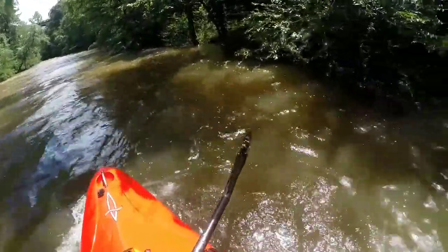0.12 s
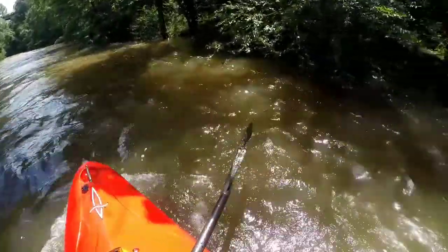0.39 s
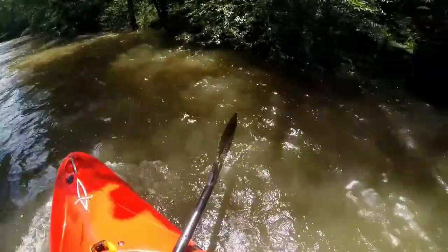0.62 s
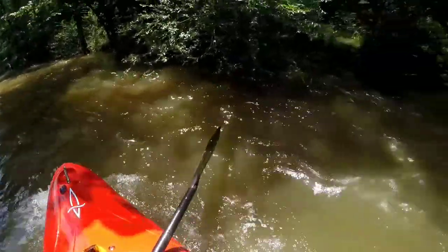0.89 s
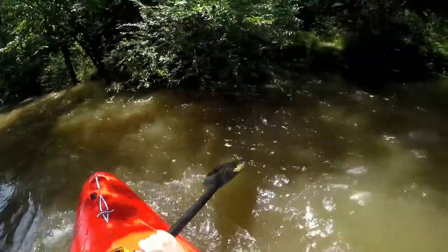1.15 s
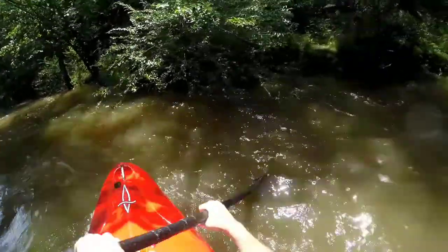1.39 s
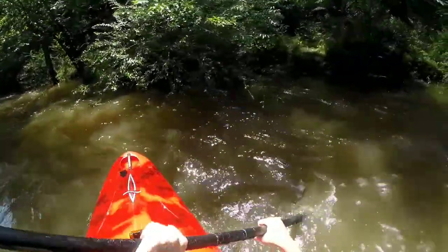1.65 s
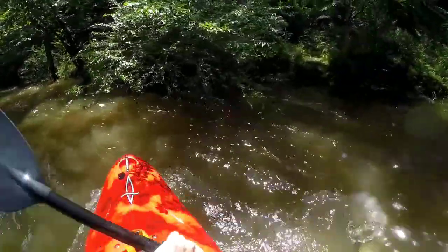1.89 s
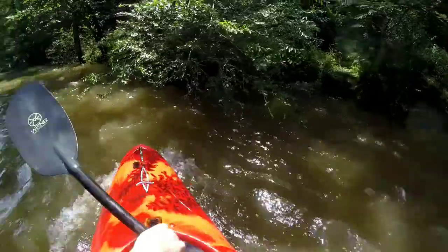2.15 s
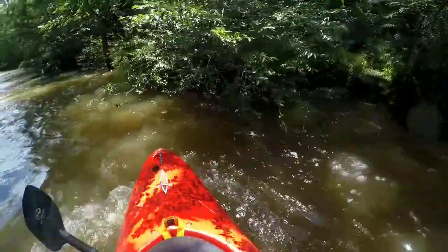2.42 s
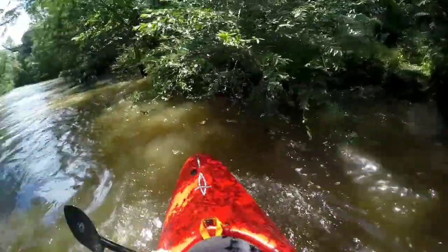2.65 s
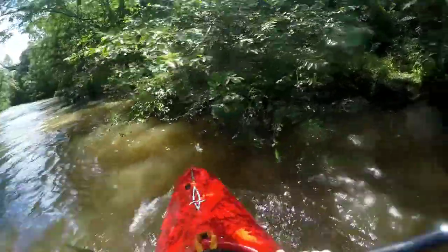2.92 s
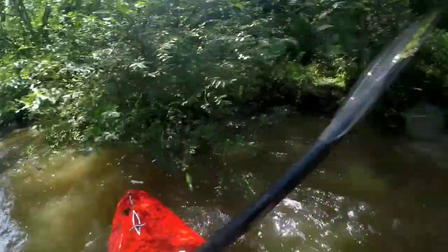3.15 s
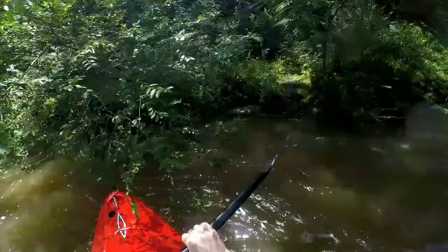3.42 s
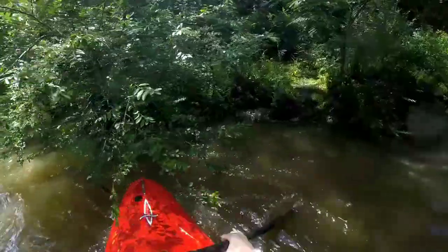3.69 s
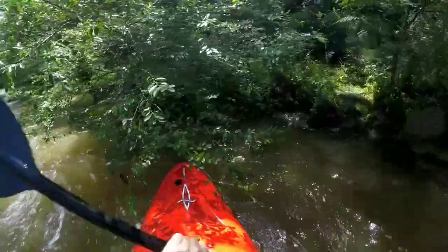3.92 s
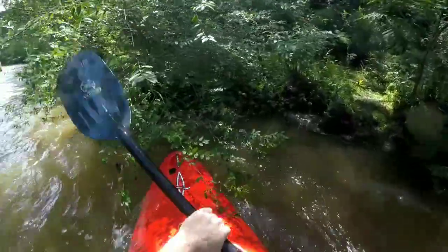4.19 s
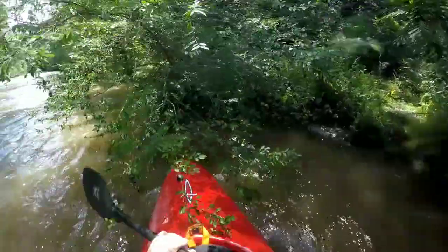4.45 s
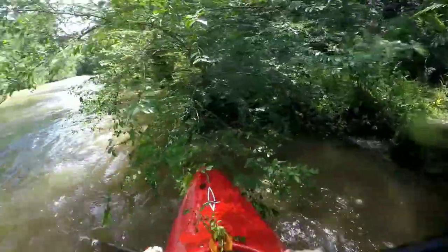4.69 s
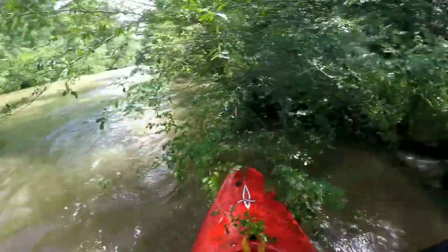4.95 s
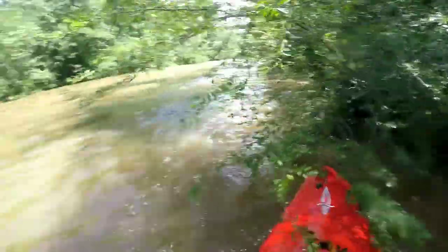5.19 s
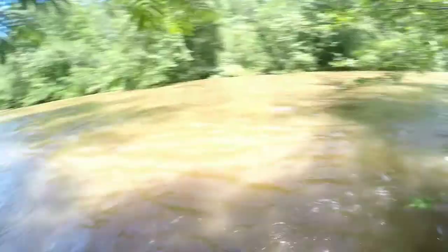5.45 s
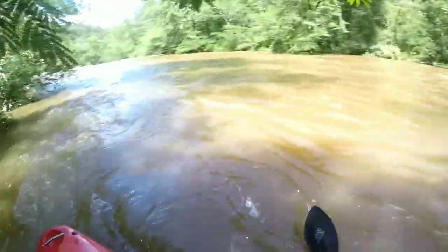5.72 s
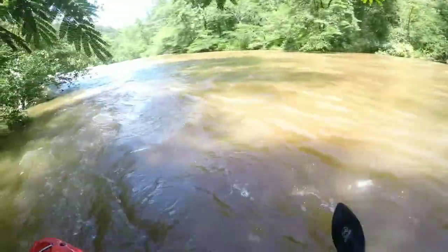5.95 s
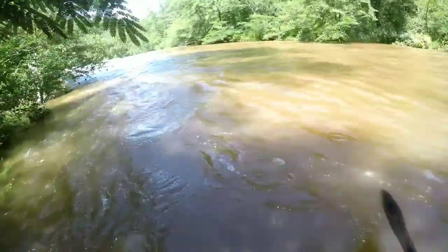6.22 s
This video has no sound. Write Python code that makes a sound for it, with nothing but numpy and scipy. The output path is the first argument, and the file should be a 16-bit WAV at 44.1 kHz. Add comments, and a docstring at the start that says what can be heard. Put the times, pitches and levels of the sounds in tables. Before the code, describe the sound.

Outdoors on a churning creek, very close to the water. A dull, ringing rush with bright fizzing spray never stops, over faint hiss and a tiny high electronic whine. Low gusts bump the encased microphone. Paddle strokes bring short splashes, round bubble plops and small clicks near two and four seconds. Toward the end the hollow midrange drops away, leaving a thinner flow and a last low wind swell.

```python
"""A kayak on a fast creek, heard from a helmet camera whose microphone sits in a sealed case.
From the start filtered water noise rushes and rings two cavities of the case, noise wind buffets and
thuds, a sine whines once a frame under steady hiss, and short rings tick and drip. Bubbles plop from
1.3 s; paddle splashes lift the rush from 1.7 s. At 2.2 s a bubble climbs and a gliding sine moans,
again at 4.0 s. After 5.3 s the lower cavity fades as the head turns away."""
import sys
import numpy as np
from scipy import signal
from scipy.fft import rfft, irfft, next_fast_len
from scipy.io import wavfile
from scipy.ndimage import uniform_filter1d

SR = 44100
rng = np.random.default_rng(int(sys.argv[2]) if len(sys.argv) > 2 else 0)


def convert_level_to_amplitude(level_db):
    """Map a level in decibels to its linear amplitude factor."""
    exponent = np.asarray(level_db, float) / 20
    return 10 ** exponent


def wrap_up_sound(samples):
    """Save the sound to the file named by the first command line argument, as 16-bit audio."""
    columns = np.atleast_2d(samples).T
    # keep every value between -1 and 1, then stretch to whole-number steps
    tamed = np.clip(columns, -1, 1)
    steps = np.round(tamed * 32767).astype(np.int16)
    wavfile.write(sys.argv[1], SR, steps)


N = 279594  # samples

# Lower cavity of the case, a close pair and a shoulder:
# multiple of the cavity pitch, width of the first pass/Hz, relative level/dB
LOWER_CAVITY = [(0.963, 277, 7), (1.082, 227, 9.5), (1.407, 346, -1.5)]
# Weak resonances of the case, a boost and a dip: f/Hz, width/Hz, level over the spray/dB
CASE_RINGS = [(5700, 660, 5.5), (3740, 130, -2.5)]
# Colour of the water through the case wall: f/Hz, relative level per Hz/dB
WALL_COLOUR = [(90, -8), (150, 4), (230, 0.5), (420, 3), (620, -0.5), (900, -3.5), (1500, -6.5),
               (2000, -9.5), (2600, -36)]
# Colour of the bright spray: f/Hz, relative level per Hz/dB
SPRAY_COLOUR = [(1500, -19), (2100, 8), (3300, 14), (4200, 10), (6200, -2), (8000, -2), (11000, -63),
                (15300, -28)]
# Colour of the mist, the highest treble of the water: f/Hz, relative level per Hz/dB
MIST_COLOUR = [(9500, -30), (11500, 2), (13000, 4), (15300, -10)]
# Wall, lower cavity, upper cavity, spray, treble ring, mist: # calm level/dB, then its gain in dB per dB of
# churn, of splash, of lower-cavity drive (0 where not listed)
WATER_PATHS = [(-51.5, 0.327, 0.51, 0.16), (-52.5, 0.22, 0.57, 0.97), (-62, 1.45, 0.4, -0.27),
               (-56.5, 0.76, 0.72, 0.084), (-72, 0.79, 1, 0.2), (-74, 0.8, 1.1, .3)]
# Churn of the water near the hull: t/s, drive over calm flow/dB, upper cavity f/Hz
HULL_CHURN = [(0.0, 4.5, 2680), (0.65, 4, 2640), (0.8, 1, 2630), (1.05, 5.5, 2640), (1.35, 1.5, 2540),
              (1.65, 5.5, 2480), (1.87, 6, 2490), (1.96, 5.5, 2570), (2.08, 7, 2500), (2.2, 9, 2680),
              (2.45, 7, 2650), (2.7, 2.5, 2600), (3.0, 3, 2560), (3.6, 0.5, 2560), (4.0, 2.5, 2620),
              (4.17, 0.5, 2500), (4.4, 5.5, 2500), (4.8, 1, 2580), (5.2, 0.5, 2570), (5.75, 0.5, 2640),
              (6.34, 2, 2740)]
# Drive of the lower cavity, which swells at 1.8 s and sinks after 5.35 s as the head turns away: t/s, drive/dB
LOWER_DRIVE = [(0.0, 0), (0.8, -3), (1.3, 1.5), (1.8, 5), (2.2, 0), (2.8, 1.5), (3.6, 0), (4.5, 1.5),
               (5.35, 2), (5.75, -9.5), (6.34, -9)]
# Wind on the microphone, before its random lumps: t/s, deep buffeting level/dB, flutter level/dB
WIND_LEVELS = [(0.0, -18.5, -40), (0.15, -24, -44.5), (0.55, -28, -39.5), (0.7, -24, -42.5),
               (0.85, -28.5, -44.5), (1.2, -27, -42.5), (1.55, -19.5, -44.5), (1.7, -28.5, -42.5),
               (2.05, -24, -43.5), (2.25, -30, -38), (2.4, -27, -40), (2.43, -25.5, -43.5),
               (2.6, -33, -44.5), (3.6, -30, -43), (3.9, -30.5, -41), (4.2, -24, -45.5), (4.3, -29.5, -47),
               (5.3, -35, -43), (5.5, -29, -40.5), (5.95, -26.5, -43.5), (6.2, -31, -43.5),
               (6.34, -17.5, -52)]
# Colour of the deep buffeting: f/Hz, relative level per Hz/dB
BUFFET_COLOUR = [(2, -11), (6, -4.5), (12, 9.5), (20, 2.5), (30, -6.5), (42, -7), (70, -51)]
# Colour of the flutter: f/Hz, relative level per Hz/dB
FLUTTER_COLOUR = [(30, -9), (48, -1.5), (75, -2), (95, -3), (120, -17.5), (170, -24), (260, -47)]
# Colour of the preamplifier hiss: f/Hz, relative level per Hz/dB
HISS_COLOUR = [(200, -1), (6000, 7), (10800, 4), (12400, 5.5), (13400, 2.5), (15300, -2)]
# Random small drips: calm rate/(1/s), lowest f/Hz, highest f/Hz, least level/dB, cycles
SMALL_DRIPS = (14, 2353, 3310, -50.5, 9)
# Random gurgles, before the lower-cavity drive moves them: the same columns
SMALL_GURGLES = (22, 885, 1400, -50, 3.5)
# Single gusts knocking the microphone: t/s, peak level/dB, f/Hz, cycles
GUST_THUDS = [(0.076, -18, 79, 1.67), (0.479, -29.5, 86.4, 3.2), (0.752, -27.5, 70, 2.9),
              (1.511, -30.5, 98, 3.6), (2.295, -28.5, 82, 4.2), (2.342, -26.5, 66, 1.1),
              (2.389, -23, 62, 1.3), (2.965, -31.5, 58.7, 1.4), (3.972, -30, 83.4, 5.9),
              (4.154, -31, 62.7, 3.5), (5.459, -28, 60, 0.47), (5.48, -32.5, 94, 4.3),
              (5.529, -26.5, 57, 0.91)]
# Drops and paddle drips that tick: t/s, ring peak level/dB, ring f/Hz, crack peak level/dB, crack f/Hz
DROP_TICKS = [(0.101, -34.5, 2720, -43, 4360), (0.172, -36, 2720, -54, 5270),
              (0.6488, -33, 2720, -41, 4270), (1.17, -51, 2730, -41, 4260),
              (1.4147, -36.5, 2730, -50, 4240), (1.6245, -37, 2500, -55, 4360),
              (1.6774, -52, 2380, -45, 5520), (1.7076, -39, 2950, -56, 4760),
              (1.7574, -33, 2740, -44, 4120), (2.091, -36, 2430, -38, 4480), (2.159, -51, 2530, -42, 6800),
              (2.352, -35.5, 2900, -50, 4510), (2.533, -55, 2510, -40.5, 5470),
              (3.0853, -48, 3030, -38.5, 7600), (3.762, -52, 2290, -40, 5300),
              (3.783, -31, 3100, -37, 9500), (3.869, -37, 2700, -44, 5400), (4.0302, -39, 3600, -54, 4220),
              (4.221, -46, 2240, -48, 8500), (4.328, -39, 2800, -40, 5420), (4.5191, -46, 2530, -44, 5530),
              (4.857, -36, 2860, -46, 5230), (5.514, -39.5, 2630, -55, 5580),
              (6.2267, -40.5, 2600, -43, 5910)]
# Closing bubbles, the big ones low: t/s, peak level/dB, f/Hz, cycles
BUBBLE_PLOPS = [(1.27, -36, 1110, 3.8), (1.52, -43, 230, 6), (1.585, -36, 1000, 5), (1.61, -36, 1040, 6.8),
                (1.655, -38, 950, 5), (1.69, -38.5, 272, 4), (1.727, -27.5, 1190, 8.8),
                (1.729, -32, 2370, 26), (1.739, -28, 1220, 4.9), (1.79, -40, 770, 11),
                (1.859, -34, 1150, 4), (1.88, -35, 930, 5), (1.985, -35, 1000, 5), (2.045, -34, 990, 6.8),
                (2.065, -33.5, 850, 4.4), (2.226, -40, 304, 4.8), (2.244, -40.5, 397, 12),
                (2.366, -38, 1010, 4.8), (2.403, -33.5, 980, 5), (3.882, -40.5, 800, 8.6),
                (4.095, -38, 1110, 6.9), (4.491, -46, 1090, 5.7), (4.517, -36, 1000, 5),
                (4.527, -40.5, 416, 8.2), (4.54, -35.5, 1000, 5.4)]
# Paddle splashes, before rise and path gain: t/s, boost/dB, fall/s
PADDLE_SPLASHES = [(1.68, 7, 0.017), (1.725, 0, 0.013), (1.99, 1, .03), (2.06, 8, 0.033), (3.77, 5, 0.034),
                   (3.95, 1.5, 0.089), (4.22, 0, 0.026), (4.32, 0, 0.046), (4.4, 2, 0.037), (4.51, 2, .03)]
# Big bubble climbing as the blade plunges: t/s, peak level/dB, start f/Hz, cycles, glide per cycle
RISING_BUBBLES = [(2.192, -42, 290, 10, .05)]
# Air slipping past the case, before roughening: t/s, length/s, peak level/dB, first f/Hz, last f/Hz,
# bend of the fall
FALLING_MOANS = [(2.197, .15, -37.5, 215, 107, .75), (4.034, 0.14, -39.5, 117.5, 85.5, 2.5)]


def evened(x):
    """Scales to rms 1."""
    return x / np.sqrt(np.mean(x ** 2) + 1e-20)


def column(table, order):
    """One column of a time table, interpolated at every sample."""
    return np.interp(np.arange(N) / SR, [row[0] for row in table], [row[order] for row in table])


def coloured(x, points):
    """Filters by a spectrum of (f/Hz, level/dB) points, silent outside them, and scales to rms 1."""
    hz, db = np.transpose(points)
    size = next_fast_len(N)
    log_hz = np.log(np.fft.rfftfreq(size, 1 / SR) + 0.1)
    gain = convert_level_to_amplitude(np.interp(log_hz, np.log(hz), db, -130, -130))
    return evened(irfft(rfft(x, size) * gain, size)[:N])


def resonate(x, hz, width):
    """Shifts the curve hz down to zero, smooths, and shifts back: a resonance of gain 1."""
    turn = np.exp(2j * np.pi * np.cumsum(hz * np.ones(len(x))) / SR)
    pole = np.exp(-np.pi * width / SR)
    smooth = signal.lfilter([1 - pole], [1, -pole], x / turn)
    return 2 * (turn * smooth).real


def cavity(x, hz, width):
    """A resonance passed twice, the second time twice as wide, for steep flanks."""
    return resonate(resonate(x, hz, width), hz, 2 * width)


def add(mix, s, sound):
    """Mixes a sound in at s seconds."""
    part = mix[round(s * SR):][:len(sound)]
    part += sound[:len(part)]


def blip(hz, cycles, glide):
    """A soft start and a decaying ring; its pitch climbs by the share glide per cycle, or sinks."""
    cycles = max(cycles, 0.5)
    u = np.arange(int(5 * cycles * SR / hz)) * hz / SR  # time in cycles
    shape = (1 - np.exp(-u / 0.45)) ** 2 * np.exp(-u / cycles * 2)
    return shape / shape.max() * np.sin(2 * np.pi * (u + glide * u ** 2 / 2))


def lumps():
    """Slow random swings of rms 1: noise smoothed twice over 0.0285 s."""
    size = round(0.0285 * SR)
    return evened(uniform_filter1d(uniform_filter1d(rng.standard_normal(N), size), size))


def water():
    """Broken water: patchy hiss plus a fizz of tiny bursting bubbles."""
    hz, t, z = signal.stft(rng.standard_normal(N), SR, nperseg=256, noverlap=192)
    patches = uniform_filter1d(rng.standard_normal(z.shape), 6, 0)
    patches = evened(uniform_filter1d(patches, 14, 1))
    flicker = evened(uniform_filter1d(rng.standard_normal(len(t)), 8))  # all bands at once
    z = z * convert_level_to_amplitude(1.1 * patches + 0.14 * flicker)
    hiss = signal.istft(z, SR, nperseg=256, noverlap=192)[1][:N]

    bursts = rng.random(N) < 1500 / SR  # 1500 per second on average
    sizes = convert_level_to_amplitude(3.4 * np.minimum(rng.exponential(1, N), 5)) * bursts
    kind, fizz = rng.integers(0, 24, N), np.zeros(N)
    for k, f in enumerate(np.geomspace(1600, 14000, 24)):
        bubble = f * blip(f, cycles=4.8, glide=0.043)
        fizz += signal.oaconvolve(sizes * (kind == k), bubble)[:N]
    return evened(hiss) + 0.46 * evened(fizz)


def rush():
    """The water comes dull through the wall, bright as spray, and rings the cavities."""
    source = water()
    churn_db, lower_drive_db = column(HULL_CHURN, order=1), column(LOWER_DRIVE, order=1)
    spray = source + sum((convert_level_to_amplitude(db) - 1) * resonate(source, hz, width) for hz, width, db in CASE_RINGS)

    lower_hz = 1069 + 7 * lower_drive_db  # the lower cavity shifts in pitch with its drive
    *pair, shoulder = (convert_level_to_amplitude(db) * cavity(source, k * lower_hz, width) for k, width, db in LOWER_CAVITY)
    lower = sum(pair) + convert_level_to_amplitude(0.47 * churn_db) * shoulder  # churn lifts the shoulder
    upper = cavity(source, column(HULL_CHURN, order=2), width=533)
    treble_ring = cavity(source, hz=9080, width=1200)

    paths = (coloured(source, WALL_COLOUR), evened(lower), evened(upper),
             coloured(spray, SPRAY_COLOUR), evened(treble_ring), coloured(source, MIST_COLOUR))
    controls = np.array([churn_db, splash(), lower_drive_db])
    out = np.zeros(N)
    for (calm_db, *shares), path in zip(WATER_PATHS, paths):
        out += convert_level_to_amplitude(calm_db + np.dot(shares, controls)) * path
    return out


def wind():
    """Wind presses on the microphone: deep pressure swings and a lumpy flutter of coloured noise."""
    buffet_db = column(WIND_LEVELS, order=1) - 1.2 * lumps()
    flutter_db = column(WIND_LEVELS, order=2) + 2.5 * lumps()
    buffet = convert_level_to_amplitude(buffet_db) * coloured(rng.standard_normal(N), BUFFET_COLOUR)
    flutter = convert_level_to_amplitude(flutter_db) * coloured(rng.standard_normal(N), FLUTTER_COLOUR)
    return buffet + flutter


def preamp_hiss():
    """Steady coloured noise of the microphone preamplifier."""
    return convert_level_to_amplitude(-61.5) * coloured(rng.standard_normal(N), HISS_COLOUR)


def whine():
    """The electronics' thin tone restarts each frame and sounds for about its second half."""
    frame_s, whine_hz, level_db = 1001 / 24000, 10277, -66.5
    share = np.arange(N) / SR / frame_s % 1  # place within the frame
    on = uniform_filter1d(1. * (share > 0.47) * (share < 0.96), size=40)
    return convert_level_to_amplitude(level_db) * on * np.sin(2 * np.pi * whine_hz * share * frame_s)


def scatter(per_s, low_hz, high_hz, db, cycles):
    """Random small bubbles over a range of pitches, denser as the water churns."""
    rate = per_s * convert_level_to_amplitude(1.5 * column(HULL_CHURN, order=1))
    starts = rng.random(N) < rate / SR
    sizes = convert_level_to_amplitude(db + 4.1 * np.minimum(rng.exponential(1, N), 2)) * starts
    kind, out = rng.integers(0, 8, N), np.zeros(N)
    for k, f in enumerate(np.geomspace(low_hz, high_hz, num=8)):
        out += signal.oaconvolve(sizes * (kind == k), blip(f, cycles, glide=0.0083))[:N]
    return out


def drips_and_gurgles():
    """Small ringing bubbles at random; the lower gurgles follow the lower-cavity drive in level."""
    return scatter(*SMALL_DRIPS) + convert_level_to_amplitude(column(LOWER_DRIVE, order=1)) * scatter(*SMALL_GURGLES)


def thuds():
    """Single gusts knock the microphone: low rings that sink slightly in pitch."""
    out = np.zeros(N)
    for s, db, hz, cycles in GUST_THUDS:
        add(out, s, convert_level_to_amplitude(db) * blip(hz, cycles, glide=-0.022))
    return out


def ticks():
    """Drops ring the upper cavity and crack in the treble as a resonant noise burst."""
    out, t = np.zeros(N), np.arange(400) / SR
    for s, db, hz, crack_db, crack_hz in DROP_TICKS:
        burst = rng.standard_normal(400) * np.exp(-t / 0.002)
        crack = cavity(burst, crack_hz, width=1400)
        add(out, s, convert_level_to_amplitude(db) * blip(hz, cycles=8.2, glide=0.0024))
        add(out, s, convert_level_to_amplitude(crack_db) * crack / abs(crack).max())
    return out


def plops():
    """Closing bubbles ring, climbing slightly in pitch."""
    out = np.zeros(N)
    for s, db, hz, cycles in BUBBLE_PLOPS:
        add(out, s, convert_level_to_amplitude(db) * blip(hz, cycles, glide=0.0031))
    return out


def splash():
    """Boost in dB that paddle splashes give all water paths: quick rise, a bell-shaped fall."""
    t, out = np.arange(N) / SR, np.zeros(N)
    for s, db, fall_s in PADDLE_SPLASHES:
        u = np.maximum(t - s, 0)
        out += db * (1 - np.exp(-u / 0.0027)) * np.exp(-(u / fall_s) ** 2)
    return out


def risers():
    """A big bubble rings low and climbs in pitch as the blade plunges."""
    out = np.zeros(N)
    for s, db, hz, cycles, glide in RISING_BUBBLES:
        add(out, s, convert_level_to_amplitude(db) * blip(hz, cycles, glide))
    return out


def moans():
    """Air slips past the case: a falling tone with a weak octave, roughened by random lumps."""
    out = np.zeros(N)
    for s, length, db, first_hz, last_hz, bend in FALLING_MOANS:
        u = np.arange(0, length, 1 / SR) / length
        hz = first_hz * (last_hz / first_hz) ** (u ** bend)
        turn = 2 * np.pi * np.cumsum(hz) / SR
        swell = abs(np.sin(np.pi * u ** 0.81))
        add(out, s, convert_level_to_amplitude(db) * swell * (np.sin(turn) + 0.067 * np.sin(2 * turn)))
    return convert_level_to_amplitude(3.5 * lumps()) * out


def scene():
    """All sources at the one microphone in the case."""
    air = wind() + thuds() + moans()
    drops = drips_and_gurgles() + ticks() + plops() + risers()
    return (rush() + air + whine() + drops)[None]


def roll_off(x):
    """The treble ends steeply here."""
    return signal.sosfilt(signal.butter(12, 15250, fs=SR, output="sos"), x)


def record(dry):
    """The microphone preamplifier adds its steady hiss."""
    mix = dry + preamp_hiss()
    return roll_off(mix)


dry = scene()
out = record(dry)
wrap_up_sound(out)
```